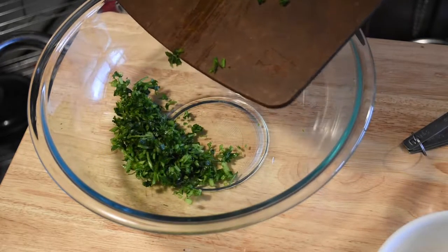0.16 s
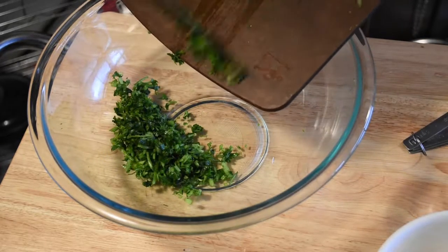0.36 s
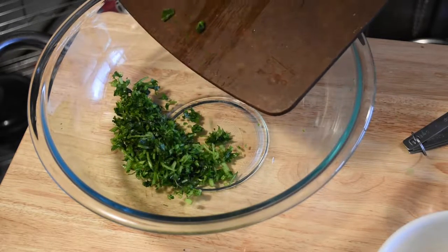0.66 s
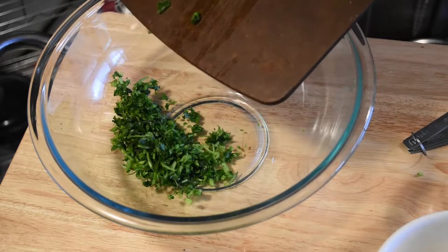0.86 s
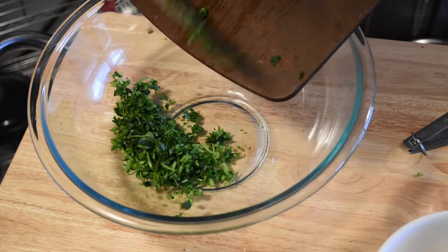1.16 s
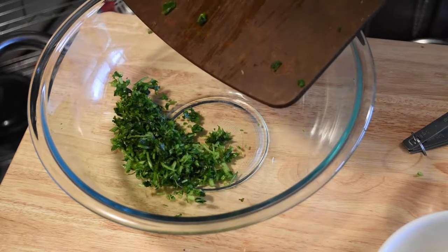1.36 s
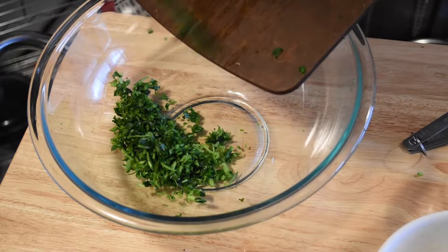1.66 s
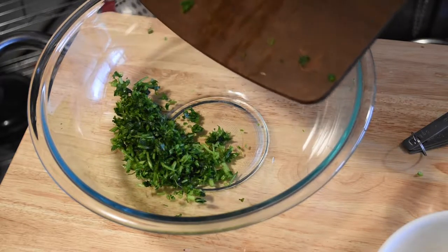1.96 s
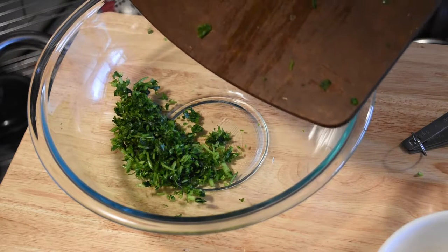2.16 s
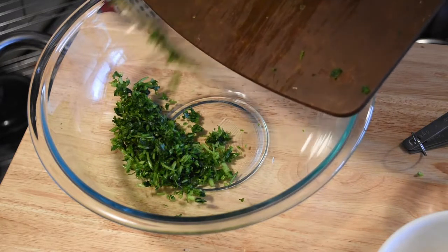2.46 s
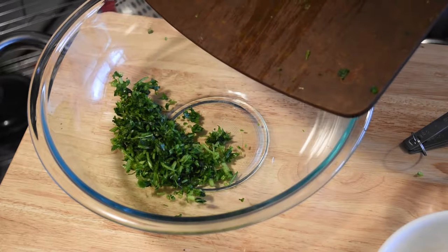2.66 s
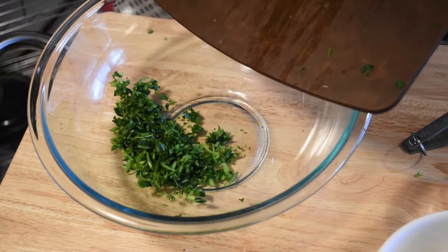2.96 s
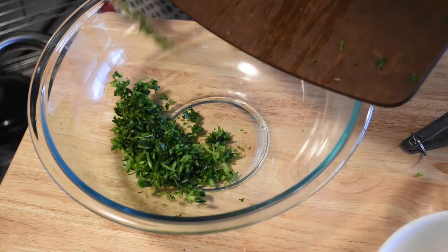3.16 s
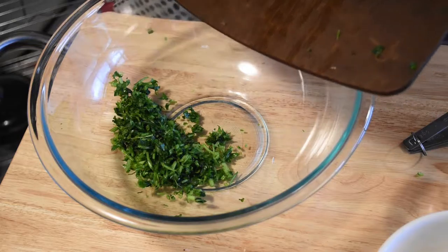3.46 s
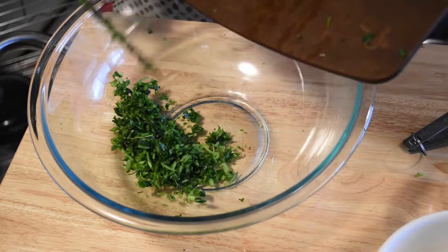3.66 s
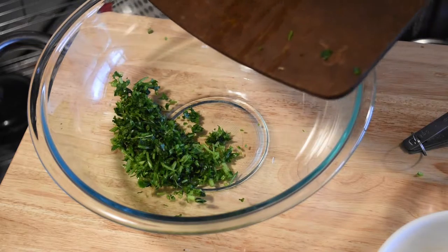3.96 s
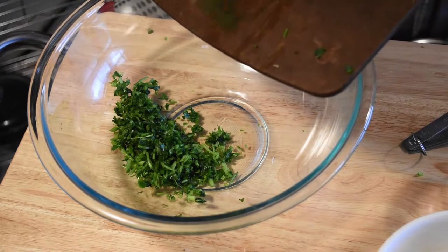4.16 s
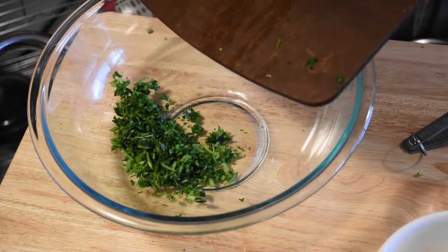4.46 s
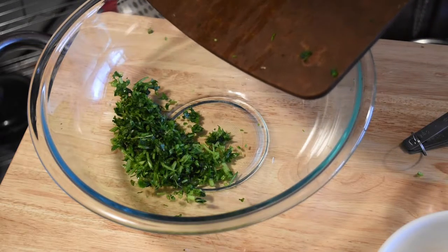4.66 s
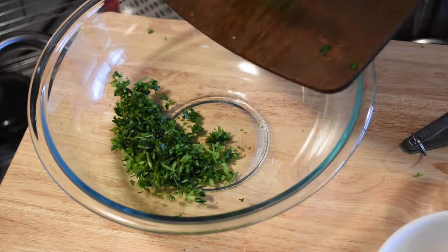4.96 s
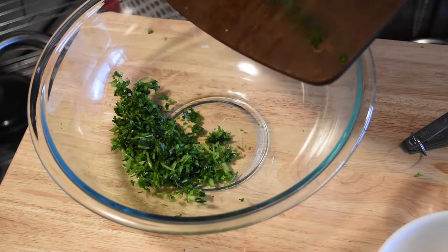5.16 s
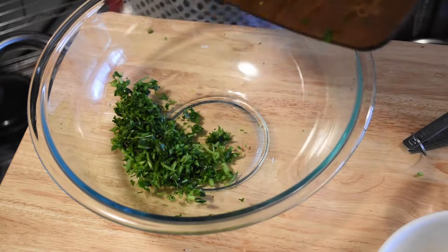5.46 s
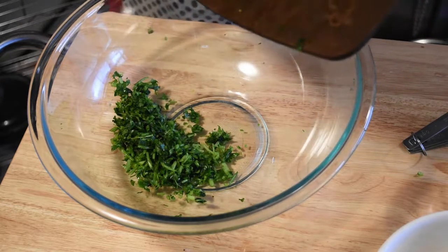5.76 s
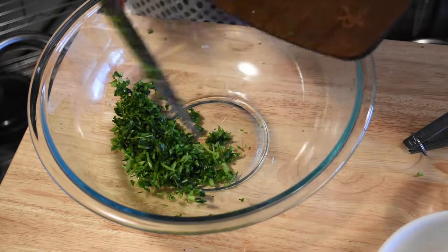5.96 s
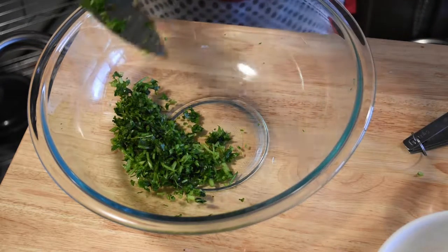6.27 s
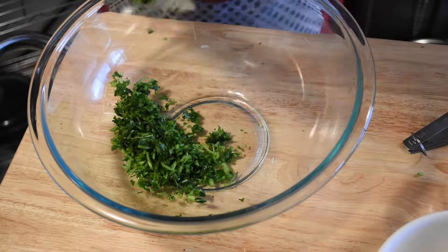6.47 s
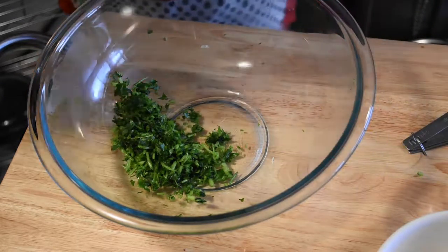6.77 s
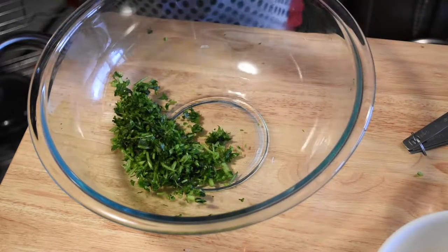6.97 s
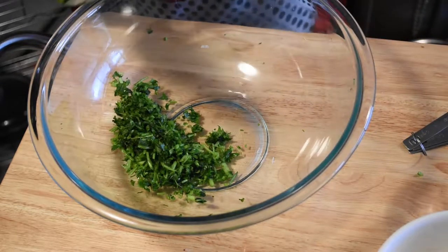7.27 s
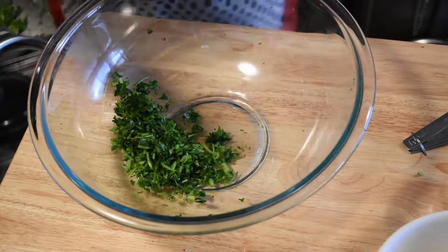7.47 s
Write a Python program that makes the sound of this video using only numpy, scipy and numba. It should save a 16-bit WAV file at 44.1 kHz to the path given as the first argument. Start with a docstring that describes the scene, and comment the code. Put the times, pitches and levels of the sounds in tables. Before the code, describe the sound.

A quiet, steady appliance hiss, slightly left, with a faint hum fills a small kitchen throughout. Close to the microphone, a knife clears chopped herbs from a wooden cutting board. It lands with a sharp wooden knock and steel clink right at the start, followed by light sliding. A quick cluster of knocks at 0.7 to 0.8 seconds leads into a firmer scrape around 1 second. Further knocks come at about 1.5, 2.3, 2.9, 3.5, 4.1, 4.6, 5.2 and 5.8 seconds, each followed by a short, raspy scrape with a slight metallic squeal and a soft rustle of leaves. The knocks are the loudest sounds, brightest near 4.1, 5.2 and 5.8 seconds, and the room rings only briefly. Around 6.2 seconds two tiny bits tick into a glass bowl. Then only the hiss and hum remain until about 7.5 seconds.

```python
"""Over an appliance's hiss and hum, a knife brushes a wooden board, knocks down on it and scrapes.
It is sweeping chopped herbs off the tilted board into a glass bowl, close to the microphone.
Each stroke lands with a knock, then the edge sticks and slips over the wood, ringing board and blade
while leaves rustle. A few bits tick into the bowl, and the small kitchen rings briefly."""
import sys
import numpy as np
from scipy import signal
from scipy.fft import rfft, irfft
from scipy.io import wavfile
from scipy.ndimage import uniform_filter1d
from numba import njit

SR = 44100
rng = np.random.default_rng(int(sys.argv[2]) if len(sys.argv) > 2 else 0)


def unload_wav(signal):
    """Save mono or channel-first audio to the path in sys.argv[1] as 16-bit WAV at rate SR, clipped to [-1, 1]."""
    wavfile.write(
        sys.argv[1],
        SR,
        np.round(np.clip(np.atleast_2d(signal).T, -1, 1) * 32767).astype(np.int16),
    )


N = 335601
T = np.arange(N) / SR
EVENT_T = T[:SR // 2]  # half a second: the time axis of one event or response


def undb(db):
    """Decibels to gain."""
    return 10 ** (np.asarray(db) / 20)


def unit_rms(x):
    """Scale to rms 1."""
    return x / np.sqrt(np.mean(x ** 2))


def unit_energy(h):
    """Scale to energy 1."""
    return h / np.sqrt(np.sum(h ** 2))


def curve_at(points, hz):
    """Read (Hz, value) points on a log-frequency axis."""
    f, value = np.transpose(points)
    return np.interp(np.log(np.maximum(hz, 1)), np.log(f), value)


def through(x, response):
    """Pass x through a response."""
    return signal.fftconvolve(x, response)[:len(x)]


def colour(spectrum, size=2048):
    """Minimum-phase response with the given (Hz, dB) spectrum."""
    cepstrum = irfft(curve_at(spectrum, np.fft.rfftfreq(size, 1 / SR)) * np.log(10) / 20)
    cepstrum[1:size // 2] *= 2
    cepstrum[size // 2 + 1:] = 0
    response = irfft(np.exp(rfft(cepstrum)))
    return unit_energy(np.pad(response, (0, len(EVENT_T) - size)))


def fade(t60):
    """Free decay by 60 dB in t60 seconds."""
    return np.exp(-np.log(1000) * EVENT_T / t60)


def modes(table, t60_scale=1, scatter_db=0, detune=0):
    """Ring of a body; where it is touched changes the strength and pitch of each mode a little."""
    ring = 0
    for k, (hz, db, t60) in enumerate(table):
        gain = (-1) ** (k // 2) * undb(db + scatter_db * rng.standard_normal())
        pitch_hz = hz * (1 + detune * rng.standard_normal())
        ring = ring + gain * fade(t60 * t60_scale) * np.sin(2 * np.pi * pitch_hz * EVENT_T)
    return unit_energy(ring)


@njit
def bandpass(x, hz, width_hz):
    """State-variable band-pass whose centre may move."""
    y, band_state, low_state = np.empty(len(x)), 0., 0.
    for i in range(len(x)):
        g, damping = np.tan(np.pi * hz[i] / SR), width_hz / hz[i]
        v = (band_state + g * (x[i] - low_state)) / (1 + g * (g + damping))
        band_state = 2 * v - band_state
        low_state += 2 * g * v
        y[i] = damping * v
    return y


def band(x, hz, width_hz):
    """Steep resonance: the band-pass applied twice."""
    centre = hz * np.ones(len(x))
    once = bandpass(x + 1e-18, centre, float(width_hz))
    return bandpass(once, centre, float(width_hz))


def wander(per_s):
    """Smooth drift between random levels, at rms 1."""
    hold = int(SR / per_s)
    steps = rng.standard_normal(len(EVENT_T))[np.arange(len(EVENT_T)) // hold]
    return unit_rms(uniform_filter1d(steps, hold))


def radiate(x):
    """A hand-held board and knife radiate little bass."""
    return signal.sosfilt(signal.butter(2, 150, "high", fs=SR, output="sos"), x)


# room tone of the kitchen, all round the microphone: (frequency [Hz], relative level [dB])
AIR_SPECTRUM = [(25, -12), (70, -11.5), (100, -8), (170, -4), (280, -0.5), (430, 0), (520, -6.5),
                (1000, -7), (2000, -17), (5000, -20), (7000, -18), (8000, -24), (10500, -22.5),
                (15000, -33)]
# its stereo width: (frequency [Hz], side relative to mid [dB])
AIR_SIDE = [(100, -18), (400, -17), (1000, -10), (2500, -0.5), (8000, -1), (15000, 1)]
# the appliance's hissing resonances, off to the left: (frequency [Hz], width [Hz], relative level [dB])
HISS_BANDS = [(2683, 130, -6.5), (2850, 250, -3), (3180, 150, -13), (3380, 56, 0), (3534, 288, -4.5),
              (3880, 300, -15), (4440, 270, -11.5), (6310, 360, -25)]
# its faint hum, in the centre: (frequency [Hz], level [dB])
HUM_TONES = [(100, -68.5), (432, -66), (15735, -79)]


def appliance():
    """Steady air noise, wider in the treble; a narrow hiss from the left, and a faint hum."""
    mid, side = (unit_rms(through(rng.standard_normal(N), colour(AIR_SPECTRUM))) for _ in range(2))
    side = irfft(rfft(side) * undb(curve_at(AIR_SIDE, np.fft.rfftfreq(N, 1 / SR))), N)
    air = np.array([mid + side, mid - side])
    hiss = sum(undb(db) * band(rng.standard_normal(N), hz, width) for hz, width, db in HISS_BANDS)
    hum = sum(undb(db) * np.sqrt(2) * np.sin(2 * np.pi * hz * T) for hz, db in HUM_TONES)
    return undb(-55) * air + np.outer(undb([-54.5, -64]), unit_rms(hiss)) + hum


def slips(per_s, spread_db):
    """Tiny releases at random moments, of uneven size."""
    n = len(EVENT_T)
    size = undb(spread_db * np.minimum(rng.standard_normal(n), 2))
    released = rng.random(n) < per_s / SR
    return unit_rms(released * size * np.sign(rng.standard_normal(n)))


# modes of the wooden board and the steel blade: (frequency [Hz], relative level [dB], t60 [s])
BOARD_MODES = [(195, -10.5, 0.05), (231, -12.5, 0.07), (266, -14, 0.054), (351.5, 1, 0.045),
               (426.6, 0, 0.06), (495, 4.5, 0.097), (562.5, -3, 0.13), (697.5, -5.5, 0.072),
               (752, -8, 0.026), (816, -2, .13), (938.5, 2.5, 0.15), (1065, 5, 0.098), (1228, -2.5, 0.15),
               (1466, 4.5, 0.11)]
BLADE_MODES = [(1684, -2, 0.11), (1983, -11.5, 0.019), (2005, 2, 0.072), (2200, -7, 0.093), (2421, 2, .05),
               (2626, 1.5, 0.022), (2659, 7, 0.024), (2989, 3, 0.055), (3307, -9.5, 0.16),
               (3380, -4, 0.056), (3760, -6.5, 0.036), (4950, -1.5, 0.022), (5370, -20.5, .035),
               (7320, -2, .02)]
# wood, steel and crushed leaves at close range: (frequency [Hz], relative level [dB])
WOOD_SPECTRUM = [(60, -41), (130, -24), (200, -20), (270, -18), (340, -2), (600, 7), (850, 7), (1100, 10.5),
                 (1400, -3), (2200, -20.5), (5000, -59)]
STEEL_SPECTRUM = [(500, -44.5), (1300, -9.5), (1700, 2), (2800, 2.5), (3400, -6), (3700, -2.5), (5000, -7),
                  (6000, -11.5), (8000, -24), (15000, -64)]
LEAF_SPECTRUM = [(1000, -48), (3000, 3.5), (4500, 0.5), (6500, 2.5), (8000, 3), (10000, 3), (12000, -6.5),
                 (15000, -20.5)]
SPOT_DB = 1.5  # each mode's strength varies with the spot that is touched
HELD_T60_SCALE = .7  # hand and wood shorten the blade's ring
ATTACK_S, RELEASE_S = .0046, .008  # time constants of the pressure
TREMOR_DB, TREMOR_PER_S = .5, 49  # the hand's force is never even
CHATTER_OCT_PER_S, FOCUS_OCT_PER_S = -1.63, 1.3  # glides as the contact travels along the edge
BEND_OCT_PER_S = .77  # the blade stiffens as it bends, so its resonances rise
GRIP_DB = 3.5  # their strengths differ from push to push
SING_DB_PER_DB, FIRM_PUSH_DB = .35, -16  # the harder the push, the more one resonance sings out


def push(length_s, blade_db, board_db, leaf_db, swell_db, chatter_hz, ring_hz):
    """The edge sticks and slips over the grain, shaking blade and board; crushed leaves crackle."""
    held_s = np.minimum(EVENT_T, length_s)
    from_middle_s = held_s - length_s / 2
    force = (1 - np.exp(-EVENT_T / ATTACK_S)) * np.exp((held_s - EVENT_T) / RELEASE_S)
    force *= undb(swell_db * from_middle_s / length_s + TREMOR_DB * wander(TREMOR_PER_S))
    friction = slips(per_s=1800, spread_db=2.5)
    rasp = through(friction * force, colour(STEEL_SPECTRUM))
    bend = 2 ** (BEND_OCT_PER_S * from_middle_s + .019 * rng.standard_normal())
    squeal = sum(undb(db + GRIP_DB * rng.standard_normal()) * band(friction, hz * bend, width_hz=50)
                 for hz, db, _ in BLADE_MODES)
    squeal = unit_rms(squeal) * force
    # the point of contact decides which blade modes ring, together with the next bending mode above
    focus_hz = ring_hz * 2 ** (FOCUS_OCT_PER_S * from_middle_s)
    focus = unit_rms(band(friction, focus_hz, width_hz=204))
    focus += undb(-5) * unit_rms(band(friction, 1.68 * focus_hz, width_hz=1300))
    ring = through(focus * force, modes(BLADE_MODES, HELD_T60_SCALE, SPOT_DB, detune=.0077))
    singing_hz = ring_hz * 2 ** (BEND_OCT_PER_S * from_middle_s / 2)
    singing = unit_rms(band(friction, singing_hz, width_hz=72)) * force
    singing_db = -8.5 + SING_DB_PER_DB * (blade_db - FIRM_PUSH_DB)
    steel = undb(-1.5) * rasp + undb(-7.5) * squeal + undb(-17) * ring + undb(singing_db) * singing

    board = unit_energy(colour(WOOD_SPECTRUM) + undb(-8) * modes(BOARD_MODES, t60_scale=1.58))
    falling_hz = chatter_hz * 2 ** (CHATTER_OCT_PER_S * from_middle_s)
    chatter = unit_rms(band(friction, falling_hz, width_hz=100)) * force
    wood = through(friction * force, board) + undb(-8) * chatter

    # leaves burst in clumps as the edge meets them
    bursts = friction + undb(9) * slips(per_s=1400, spread_db=.5)
    crackle = unit_rms(bursts * undb(3 * wander(per_s=130)))
    rustle = through(crackle * force, colour(LEAF_SPECTRUM))
    return undb(blade_db) * steel + undb(board_db) * wood + undb(leaf_db) * rustle


# close to the microphone, the blade slides lightly, then bears down to sweep the herbs off:
# (time [s], length [s], blade level [dB], board level [dB], leaf level [dB], swell over the push [dB],
# chatter pitch [Hz], favoured blade ring [Hz])
BLADE_PUSHES = [(0.0, 0.026, -52, -39, -73, 1, 400, 1600), (0.067, 0.092, -34.5, -34.5, -39, 9, 570, 1650),
                (0.165, 0.034, -33, -24.5, -29.5, -1, 573, 1050),
                (0.208, 0.19, -41.5, -39.5, -42.5, 6.5, 627, 1690),
                (0.361, 0.061, -36.5, -34.5, -45.5, -6, 560, 1740),
                (0.897, 0.067, -23, -26, -30.5, 6.5, 737, 1980),
                (0.967, 0.074, -17.5, -27.5, -25.5, -5.5, 590, 1735),
                (1.037, 0.092, -16, -27.5, -23.5, -9.5, 680, 1720),
                (1.544, 0.2, -34, -33, -38.5, 8.5, 583, 1600),
                (1.689, 0.063, -13.5, -25.5, -20, -2, 700, 1770),
                (2.292, 0.046, -24, -26, -39.5, 1.5, 560, 2830),
                (2.344, 0.11, -39.5, -34, -42, 22.5, 570, 1950),
                (2.436, 0.089, -14.5, -23.5, -24, -7.5, 583, 1740),
                (2.93, 0.034, -24, -27.5, -32, 4, 800, 1700),
                (2.973, 0.091, -30.5, -29, -36.5, 13.5, 605, 2110),
                (3.058, 0.064, -18, -27.5, -27, -2, 537, 1913),
                (3.505, 0.047, -19, -29.5, -27, 13, 1000, 2500),
                (3.556, 0.048, -32, -40, -38.5, 9, 820, 1700),
                (4.083, 0.06, -24, -28, -36, -4.5, 800, 2940), (4.144, 0.042, -32, -27, -31, 7, 790, 3000),
                (4.195, 0.071, -17, -26.5, -25, -8, 578, 1705),
                (4.616, 0.043, -33.5, -31.5, -32.5, 5, 500, 1520),
                (4.659, 0.067, -26.5, -25.5, -32.5, 2, 638, 2293),
                (4.722, 0.049, -15, -25, -27.5, 1.5, 615, 2048),
                (4.761, 0.057, -13.5, -26, -24, -4, 550, 1736),
                (5.186, 0.068, -24, -31, -32.5, 11.5, 594, 1874),
                (5.798, 0.044, -19.5, -32, -33, 7.5, 650, 2820),
                (5.85, 0.054, -20.5, -30, -27.5, 0, 900, 2190)]
# the edge catches in the grain and jumps free: (time [s], level [dB])
EDGE_CATCHES = [(0.0751, -15), (1.1075, -9.5), (4.0993, -11), (4.205, -15.5), (4.7619, -12), (5.859, -14.5)]


def scraping():
    """All pushes of the blade, and the short rasps where its edge catches."""
    out = np.zeros(N)
    for start_s, *gesture in BLADE_PUSHES:
        add(out, start_s, push(*gesture))
    for start_s, db in EDGE_CATCHES:
        jump = rng.standard_normal(len(EVENT_T)) * fade(.071)
        blade = unit_energy(colour(STEEL_SPECTRUM) + undb(-9.5) * modes(BLADE_MODES))
        add(out, start_s, undb(db) * through(jump, blade))
    return radiate(out)


def add(track, start_s, sound):
    """Mix a sound into the track."""
    i = int(start_s * SR)
    track[i:i + len(sound)] += sound[:N - i]


# the knife lands on the board, close to the microphone:
# (time [s], board level [dB], blade level [dB], edge level [dB], thump level [dB], ring centre [Hz])
KNIFE_LANDINGS = [(0.044, 15, 14.5, 9.5, -12, 2500), (0.673, 10.5, 8, 7.5, -31, 2940),
                  (0.68, 10, 9, 0, -11.5, 2870), (0.763, 2.5, -5.5, -33, -20, 2840),
                  (0.835, 16, 5.5, -2, -23, 2470), (1.48, 13.5, -1.5, -3.5, -36, 2750),
                  (2.2666, 15, 11.5, -1, -29, 3020), (2.908, 6.5, -14, -8.5, -30, 2200),
                  (3.496, 15, 6.5, -2, -25, 2220), (4.052, 10, 16, 16.5, -8.5, 2910),
                  (4.572, 10, -5, -9.5, -31, 2450), (5.171, 9, 14.5, 17.5, -10.5, 3155),
                  (5.775, 4.5, 14, 17.5, -37.5, 2950)]
# buzz of the edge on the wood: (frequency [Hz], relative level [dB])
EDGE_SPECTRUM = [(80, -44.5), (500, -12), (2500, 15.5), (4000, 9.5), (6200, 3.5), (7500, 5.5), (9500, -1),
                 (12000, -8.5), (16000, -21)]


def knocks():
    """The blade lands: the board knocks and is pushed down, the steel clinks, the edge buzzes briefly."""
    out = np.zeros(N)
    thump = unit_energy(np.sin(2 * np.pi * 75 * EVENT_T) * fade(.024))
    bite = 1 - np.exp(-EVENT_T / .0004)  # the edge takes a moment to bite
    for start_s, board_db, blade_db, edge_db, thump_db, ring_hz in KNIFE_LANDINGS:
        board_ring = modes(BOARD_MODES, t60_scale=.8, scatter_db=SPOT_DB, detune=.004)
        knock = unit_energy(radiate(undb(-.5) * board_ring + colour(WOOD_SPECTRUM)))
        blade_ring = modes(BLADE_MODES, HELD_T60_SCALE, SPOT_DB, detune=.0047)
        steel = blade_ring + undb(-2.5) * colour(STEEL_SPECTRUM)
        clink = unit_energy(steel + undb(3) * band(steel, ring_hz, width_hz=740))
        contact = rng.standard_normal(len(EVENT_T)) * fade(.013) * bite
        buzz = unit_energy(through(contact, colour(EDGE_SPECTRUM)))
        add(out, start_s, undb(board_db) * knock + undb(thump_db) * thump)
        add(out, start_s, undb(blade_db) * clink + undb(edge_db) * buzz)
    return out


# bits of herb snap or drop into the bowl below the board: (time [s], level [dB], centre [Hz])
HERB_TICKS = [(0.661, -17, 9620), (3.842, -29, 3400), (6.223, -29.5, 8400), (6.247, -22, 5160)]


def herb_bits():
    """Damp scraps of leaf tick against the glass."""
    out = np.zeros(N)
    for start_s, db, hz in HERB_TICKS:
        tick = band(rng.standard_normal(len(EVENT_T)) * fade(.0079), hz, width_hz=4500)
        add(out, start_s, undb(db) * unit_energy(tick))
    return out


# the small kitchen's ring, heard from the worktop: (frequency [Hz], t60 [s])
KITCHEN_DECAY = [(150, 0.34), (600, 0.23), (2000, 0.24), (5000, 0.31), (9000, 0.18), (15000, 0.22)]
# its stereo width at the microphone: (frequency [Hz], side relative to mid [dB])
KITCHEN_SIDE = [(100, -12), (300, -26), (600, -30.5), (1400, -27.5), (2800, -14), (5000, -7), (14000, -4.5)]


def kitchen(x, wet_db, build_s):
    """Worktop, bowl and walls return a dense short ring in stereo around the centred direct sound."""
    n = len(EVENT_T)
    freqs = np.fft.rfftfreq(n, 1 / SR)
    noise = rfft(rng.standard_normal((2, n)))
    band_hz, band_t60 = np.transpose(KITCHEN_DECAY)
    tail = 0
    for one_band, t60 in zip(np.eye(len(band_hz)), band_t60):
        weight = curve_at(np.c_[band_hz, one_band], freqs)
        tail = tail + irfft(noise * weight, n) * fade(t60)
    mid_tail, side_tail = tail * (1 - np.exp(-EVENT_T / build_s))
    side_tail = irfft(rfft(unit_energy(side_tail)) * undb(curve_at(KITCHEN_SIDE, freqs)), n)
    wet = undb(wet_db)
    mid = x + wet * through(x, unit_energy(mid_tail))
    side = wet * through(x, side_tail)
    return np.array([mid + side, mid - side]) / np.hypot(1, wet)


def scene():
    """Knife and herbs up close, a touch left of centre, with the appliance in the background."""
    knife = kitchen(scraping() + knocks() + herb_bits(), wet_db=-3.5, build_s=.00022)
    return knife * undb([[.15], [-.15]]) + appliance()


def record(dry):
    """The hardest knocks overload the microphone input; the treble above 16 kHz is cut."""
    lowpass = signal.ellip(8, .2, 70, 16000, fs=SR, output="sos")
    return signal.sosfilt(lowpass, np.clip(dry, -1, 1))


dry = scene()
out = record(dry)
unload_wav(out)
```